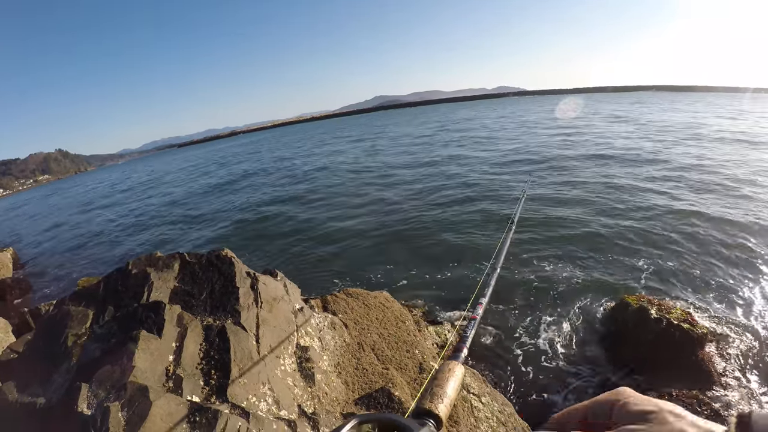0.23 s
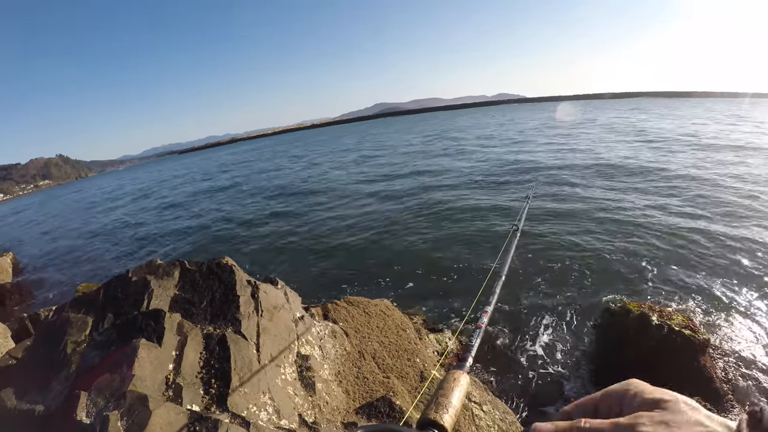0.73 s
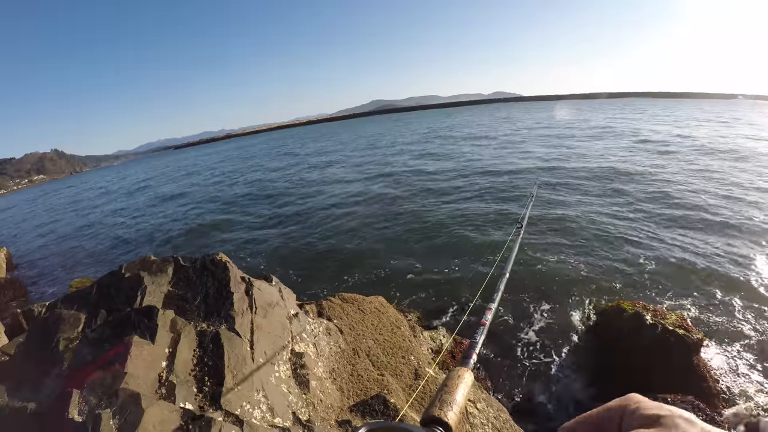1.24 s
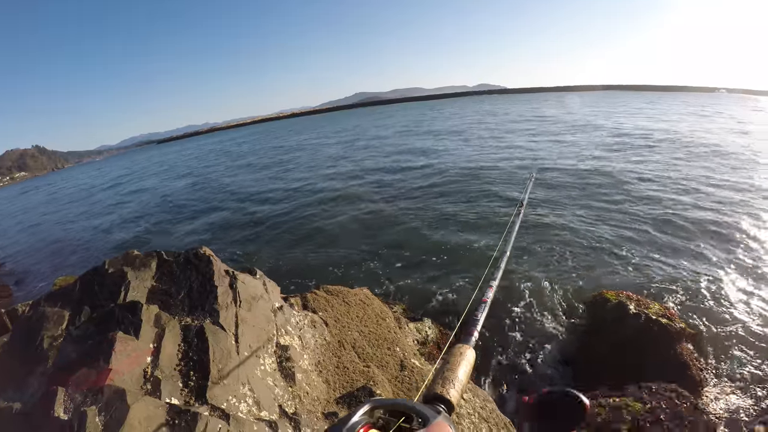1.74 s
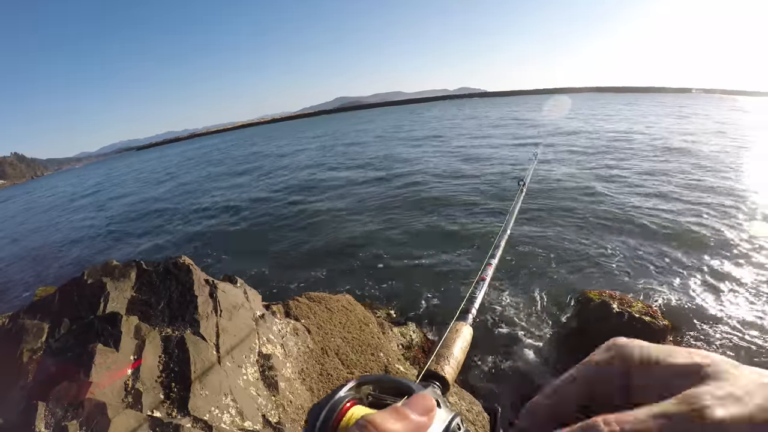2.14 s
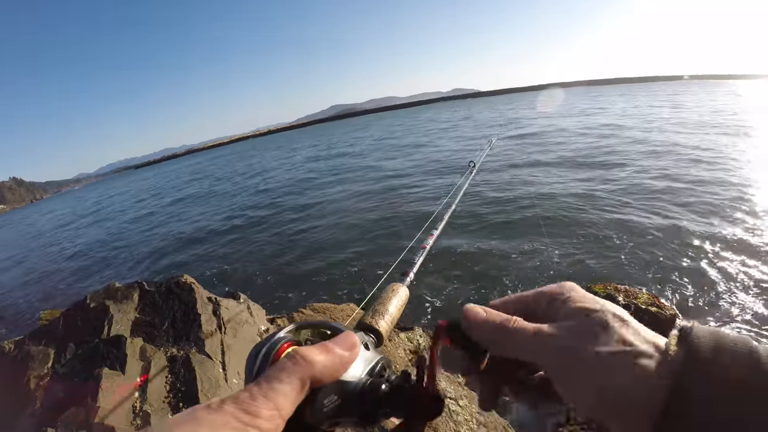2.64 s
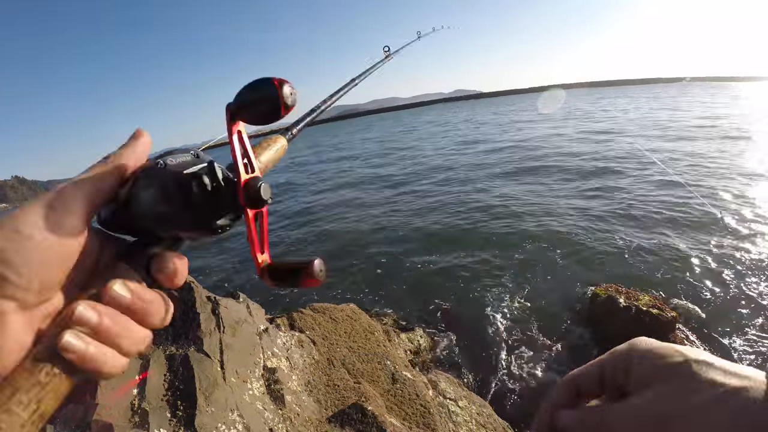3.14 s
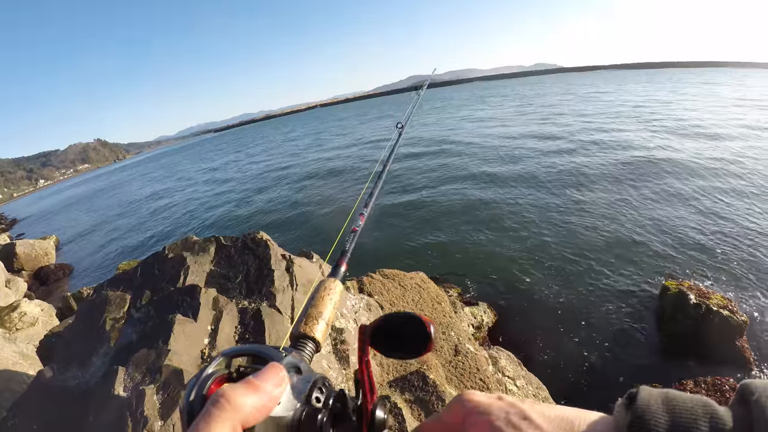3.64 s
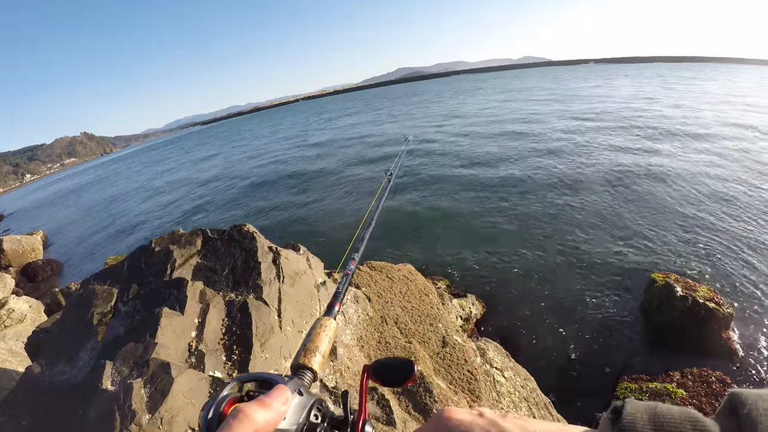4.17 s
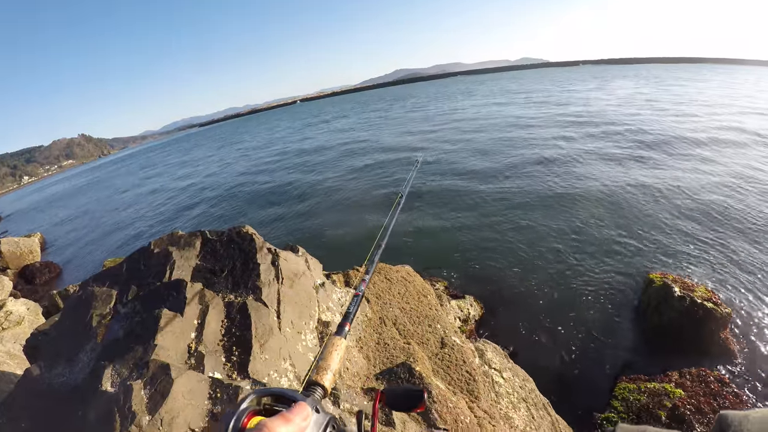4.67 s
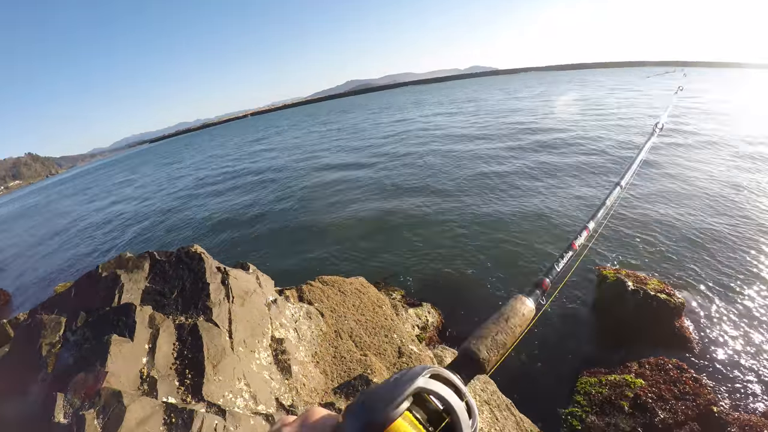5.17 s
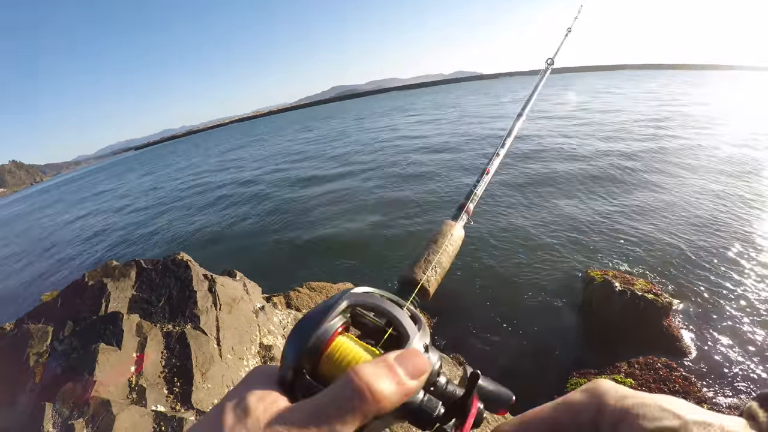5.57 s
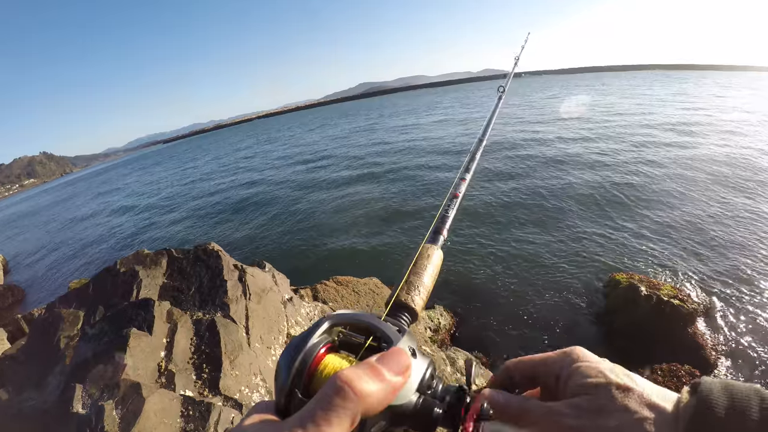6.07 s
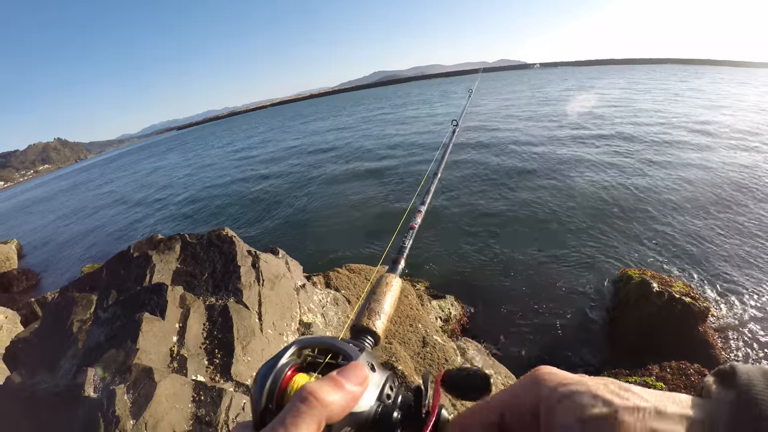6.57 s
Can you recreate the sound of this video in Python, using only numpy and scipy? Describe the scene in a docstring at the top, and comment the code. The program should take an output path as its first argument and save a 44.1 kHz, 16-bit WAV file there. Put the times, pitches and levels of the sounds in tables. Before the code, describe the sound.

Small ocean waves slosh, gulp and fizz against rocks, then drop to calmer lapping with light wind and faint fishing reel clicks.

```python
"""Small waves wash over jetty rocks in the wind, close to a microphone worn by an angler.
First a wave runs in: crests slap, trapped air gulps, and the fishing reel clicks once. Near 3 s the
wave surges against the rocks in a peak of rumble, slosh and fizzing foam. At 3.26 s a hard cut drops to
a calmer sea in mono, lapping and gulping under gusts. Around 5 s the reel clicks and rasps in the hand;
from 5.5 s the stereo image opens again, and at the end the next wave starts to build."""
import sys
import numpy as np
from scipy import signal
from scipy.fft import rfft, irfft
from scipy.io import wavfile
from scipy.ndimage import uniform_filter1d

SR = 44100
rng = np.random.default_rng(int(sys.argv[2]) if len(sys.argv) > 2 else 0)


def wav_out(sig):
    """Save sig, one row per channel (or a flat mono array), as 16-bit PCM at SR to the path in sys.argv[1]."""
    wavfile.write(sys.argv[1], SR, np.round(np.clip(np.atleast_2d(sig).T, -1, 1) * 32767).astype(np.int16))


N = 300321
TIME, HZ = np.arange(N) / SR, np.fft.rfftfreq(N, 1 / SR)


# slow fader moves of the wave: (time [s], rumble [dB], slosh [dB], foam [dB])
WAVE_FADERS = [(0, -29, -33.5, -44.5), (.65, -29.5, -35.5, -46), (1.15, -28, -37, -45.5),
               (1.6, -28.5, -35.5, -41), (1.88, -28.5, -36, -41.5), (2.08, -27.5, -33.5, -37),
               (2.6, -27.5, -31.5, -37), (2.9, -24, -28.5, -37.5), (3.25, -24.5, -30.5, -40)]
# tone of the wave: (frequency [Hz], relative level [dB])
WAVE_EQ = [(60, -47), (104, -32.5), (124, -25.5), (148, -1), (340, -2.5), (620, -7.5), (850, -7.5),
           (1150, -14), (1700, -14), (2900, -24.5), (4100, -26.5), (4800, -30), (6400, -25.5), (8200, -39),
           (9900, -44), (11200, -54.5), (12400, -50.5), (14500, -61)]
# water surging against the rocks: (start [s], hold [s], lift before each layer's share [dB])
SURGES = [(-0.02, 0.11, 4.5), (0.225, 0.14, 4.5), (0.421, 0.054, 4.5), (0.496, 0.076, 5), (0.748, 0.13, 2),
          (0.88, 0.059, 3), (1.48, 0.03, -1), (2.18, 0.03, 3), (2.65, 0.081, 2), (2.794, 0.065, 1.5),
          (2.933, 0.028, 1.5), (3.212, 0.03, 3.5)]
# sheets of spray falling back on the water: (start [s], hold [s], foam lift [dB])
SPRAYS = [(.44, 0.045, 1.5), (.7, .05, 2.5), (1.37, 0.026, 1.5), (2.635, 0.028, 1.5), (2.955, .03, 3.5),
          (3.04, 0.059, 3.5)]

def breaking_wave(low, mid, high):
    """The wave surges against the rocks, lifting the rumble most; falling spray flares the foam."""
    levels_db = ride_faders(WAVE_FADERS, SURGES, shares=(0.95, 0.27, 0.46))
    return sea([low, mid, high * gain_of(lift(SPRAYS))], WAVE_EQ, levels_db, deepening=1.0)


# slow fader moves of the calm: (time [s], rumble [dB], slosh [dB], foam [dB])
CALM_FADERS = [(3.28, -40, -49, -58.5), (3.9, -37.5, -50, -60), (4.9, -39, -51, -60),
               (5.25, -35.5, -49, -57.5), (5.9, -38.5, -46, -57), (6.5, -35, -47.5, -57.5),
               (6.8, -34.5, -38.5, -53.5)]
# tone of the calm: (frequency [Hz], relative level [dB])
CALM_EQ = [(60, -35), (104, -34), (124, -15), (148, -0.5), (320, -3.5), (520, -10.5), (800, -14.5),
           (1150, -21.5), (2000, -22), (3100, -32.5), (4200, -30.5), (7200, -39), (10000, -40),
           (11800, -47), (14500, -54)]
# wavelets lapping: (start [s], hold [s], lift before each layer's share [dB])
LAPS = [(3.405, 0.12, 9), (3.588, 0.051, 7), (4.05, 0.09, -0.5), (4.78, 0.037, 2), (5.075, 0.059, 5),
        (5.335, 0.04, 1.5), (5.584, 0.1, 2.5)]

def calm_sea(low, mid, high):
    """Wavelets lap: single bubbles stand out in calmer water, and the treble is a distant hiss."""
    single_bubbles = bubbles(486.0, 1376, per_s=260, cycles=4.3, spread_db=2.0, glide=0.018)
    lapping = mid + gain_of(-15.0) * ports(single_bubbles)
    hiss = high + ports(patchy_noise(patch_db=2.0, size=(8, 9)))
    levels_db = ride_faders(CALM_FADERS, LAPS, shares=(0.43, 0.19, 0.23))
    return sea([low, lapping, hiss], CALM_EQ, levels_db, deepening=0.13)


def sea(textures, eq, levels_db, deepening):
    """Rumble, slosh and foam share one EQ; each has its own band and rides its own fader."""
    bands = below(479), above(362) * below(1750), above(2360)
    cores_hz = (110, 450), (550, 2000), (2800, 9000)  # each layer's level is set in this range
    out = np.zeros((2, N))
    for texture, band, (lo, hi), level_db in zip(textures, bands, cores_hz, levels_db):
        layer = filtered(texture, band * gain_of(curve(eq)))
        core = filtered(layer.mean(0), (HZ > lo) & (HZ < hi))
        out += layer / core.std() * gain_of(level_db)
    # when the rumble swells, its lowest part swells further, so the sound deepens
    surge_db = levels_db[0] - levels_db[0].mean()
    return out + filtered(out, below(250) ** 2) * (gain_of(deepening * surge_db) - 1)


def rumble(lump_db=1.1):
    """Wind eddies and surging water: lumpy noise that feeds the sea's low band."""
    return rng.standard_normal((2, N)) * gain_of(lump_db * wander(17.0))


def slosh(bubbles_db=-12, flicker_db=-0.26):
    """Water folds over the rocks and traps a dense crowd of small bubbles."""
    air = bubbles(449.7, 2890, per_s=1300, cycles=4.1, spread_db=1.0, glide=0.012)
    water = patchy_noise(patch_db=1.0, size=(9, 4))
    return (water + gain_of(bubbles_db) * air) * gain_of(flicker_db * wander(37))


def foam(spray_db=-8.0, flicker_db=0.67):
    """Bursting foam hisses; droplets of spray tick on the water."""
    spray = bubbles(1980, 13000, per_s=2800, cycles=3.8, spread_db=3.5, glide=0.015)
    hiss = patchy_noise(patch_db=1.5, size=(8, 9))
    return (hiss + gain_of(spray_db) * spray) * gain_of(flicker_db * wander(22))


def bubbles(lo_hz, hi_hz, per_s, cycles, spread_db, glide, pitches=36):
    """Two swarms of bubbles, each a damped ring rising in pitch; most are soft, a few loud."""
    out = np.zeros((2, N))
    for hz in np.geomspace(lo_hz, hi_hz, pitches):
        age = np.arange(int(5 * cycles * SR / hz) + 8) * hz / SR / cycles  # in decay times
        ring = np.sin(2 * np.pi * cycles * age * (1 + glide * age))
        ring = ring * np.exp(-age) * (1 - np.exp(-8 * age))
        onset, swarm, luck, chance = rng.random((4, 1200))
        born = chance < per_s * N / SR / pitches / len(chance)
        strength = gain_of(spread_db * np.minimum(-np.log(1 - luck), 4))
        births = np.zeros((2, N))
        births[(2 * swarm[born]).astype(int), (onset[born] * N).astype(int)] = strength[born]
        out += hz * signal.oaconvolve(births, ring[None], axes=1)[:, :N]
    return unit_rms(out)


# crests hitting the rock: (time [s], relative level [dB], top of the body [Hz], decay [s])
SLAPS = [(0.262, -15, 1200, 0.028), (0.328, -19, 1170, 0.03), (0.435, -15, 750, 0.024),
         (0.456, -19, 1000, 0.018), (0.535, -14.5, 700, 0.022), (0.576, -19, 1300, 0.0042),
         (2.305, -13.5, 895, .012), (2.408, -12.5, 690, 0.02), (2.472, -18, 890, 0.024),
         (2.794, -11, 1310, 0.013), (2.856, -26, 1200, 0.018), (2.978, -13, 1000, 0.013),
         (3.124, -12, 1000, 0.019), (3.449, -32, 900, 0.028), (4.8, -33.5, 1100, 0.013),
         (4.829, -30, 700, .008), (5.69, -29, 1100, 0.014), (6.394, -33, 800, 0.0046),
         (6.442, -36, 900, .018), (6.52, -31, 900, 0.0089), (6.625, -34, 800, 0.01),
         (6.723, -22.5, 750, 0.011)]

def slaps(trim_db=-3, attack_s=0.00201):
    """A crest folds against the rock: a quick burst of splash, duller or brighter with its body."""
    out, t = np.zeros((2, N)), np.arange(SR // 8) / SR
    for s, db, body_hz, decay_s in SLAPS:
        band = signal.butter(1, [body_hz / 3, body_hz], "bandpass", fs=SR, output="sos")
        envelope = (1 - np.exp(-t / attack_s)) * np.exp(-t / decay_s)
        for side in out:
            burst = signal.sosfilt(band, rng.standard_normal(len(t))) * envelope
            add(side, s - attack_s, gain_of(db + trim_db) * burst / abs(burst).max())
    return ports(filtered(out, above(190, order=14) * below(2100, order=4)))


# air pockets between the rocks: (time [s], relative level [dB], pitch [Hz], decay [s])
GULPS = [(0.203, -8.5, 333, 0.014), (0.532, -9, 305, 0.008), (0.808, -11.5, 287, 0.023),
         (1.488, -11, 300, 0.01), (2.04, -13.5, 1580, 0.0041), (2.826, -7, 250, 0.0059),
         (2.902, -3, 210, 0.0039), (2.946, -6.5, 332, 0.0093), (2.96, -11, 208, 0.0096),
         (3.035, -6, 212, 0.0045), (3.082, -13, 203, 0.0061), (3.18, -12, 192, .006),
         (3.229, -11, 251, 0.0064), (3.431, -29, 730, 0.011), (3.461, -30, 850, 0.0054),
         (3.506, -37, 1360, .005), (3.596, -37, 1050, .005), (3.636, -34, 1140, .006),
         (3.819, -42, 1400, .007), (4.79, -33, 649, .006), (4.829, -24, 567, .006),
         (5.092, -28, 845, 0.0077), (5.647, -24, 720, 0.0059), (5.705, -32, 1110, 0.006),
         (5.788, -21, 230, .004), (5.925, -23, 330, .005), (5.972, -30, 700, .006),
         (6.144, -22, 594, 0.004), (6.647, -24, 694, 0.0054), (6.707, -33, 2150, .004),
         (6.767, -16.5, 920, 0.0053)]

def gulps(trim_db=-3, detune=0.12, stagger_s=0.018, rise_per_s=1.4, count=7):
    """Each pocket of air breaks into a few bubbles that chirp upward, the first the loudest."""
    out, t = np.zeros(N), np.arange(SR // 10) / SR
    for s, db, hz, decay_s in GULPS:
        envelope = np.exp(-t / decay_s) * (1 - np.exp(-t / 0.002))
        for k in range(count):
            trailing = k > 0
            pitch = hz * np.exp(detune * rng.standard_normal() * trailing)
            delay = stagger_s * rng.random() * trailing
            ring = np.sin(2 * np.pi * pitch * t * (1 + rise_per_s * t)) * envelope
            add(out, s + delay, gain_of(db + trim_db) * ring / (1 + k) ** 2)
    return filtered(out, above(140, order=18))


# clicks and scrapes of the reel and its handle:
# (time [s], relative level [dB], centre [Hz], half-width [octaves], rasp decay [s], metal ring [0-1])
REEL_CLICKS = [(1.1822, -26.5, 6940, 0.16, .002, 0.1), (4.09, -45, 4400, .3, .008, 0),
               (4.33, -44, 4400, .3, 0.0046, 0), (5.054, -43, 4200, .2, 0.036, 0),
               (5.0747, -34, 3200, .9, .0015, .25), (5.08, -40, 4400, 0.36, .006, 0),
               (5.0844, -28, 4800, .9, 0.0012, .42), (5.097, -40, 2000, 0.54, .012, 0),
               (5.1035, -41, 4300, 0.27, 0.0063, .4), (5.1225, -35, 4860, 0.26, 0.0012, 0.2),
               (5.139, -41, 4000, 0.23, .006, .45), (5.185, -41.5, 3900, .2, .008, 0),
               (5.1899, -24.5, 3370, 0.75, 0.00079, .08), (5.19, -27.5, 550, 0.67, .001, 0.04),
               (5.8343, -38, 4000, 0.8, 0.0018, 0), (6.1074, -40, 6150, .6, 0.0054, 0),
               (6.2373, -33, 7000, 0.64, 0.0014, 0.1), (6.5949, -42, 6170, 0.11, .003, 0)]
# resonances of the reel's body: (frequency [Hz], width [Hz], relative level [dB])
REEL_BODY = [(850, 660, 17), (3200, 1700, 11), (4200, 380, -7), (5200, 290, -1), (7500, 510, -5),
             (9500, 550, 10)]
# modes of its metal parts: (frequency [Hz], relative level [dB], decay [s])
REEL_METAL = [(4070, 1, .004), (4530, -4, .0025), (7750, -7, .002), (9340, -10, .003)]

def reel(rasp=0.52, grit_db=3.0, contact_s=.0003):
    """A snap and a gritty rasp pass through the reel's body; some contacts also ring the metal."""
    out, t, f = np.zeros(N), np.arange(4096) / SR, np.fft.rfftfreq(4096, 1 / SR)
    body = sum(gain_of(db) * 1j * f * width / (hz ** 2 - f ** 2 + 1j * f * width)
               for hz, width, db in REEL_BODY)
    body = body / np.sqrt(1 + (f / 10500) ** 12)
    metal = sum(gain_of(db) * np.sin(2 * np.pi * hz * t) * np.exp(-t / decay_s)
                for hz, db, decay_s in REEL_METAL)
    metal = metal * (1 - np.exp(-t / contact_s))
    snap = t == 0
    for s, db, centre_hz, octaves, rasp_s, ring in REEL_CLICKS:
        roughness = unit_rms(uniform_filter1d(rng.standard_normal(len(t)), size=40))
        grit = unit_rms(gain_of(grit_db * roughness))
        contact = rasp * grit * rng.standard_normal(len(t)) * np.exp(-t / rasp_s) - snap
        bell_eq = 1 / (1 + (np.log2((f + 1) / centre_hz) / octaves) ** 2)
        click = irfft(rfft(contact) * body * bell_eq)
        click = click / abs(click).max() + ring * metal
        add(out, s, gain_of(db) * np.roll(click, SR // 1000))  # 1 ms of room for the attack
    return out


# gusts pressing on the microphone: (peak time [s], half-length [s], level [dB])
GUSTS = [(3.45, 0.3, -59), (4.3, 0.41, -67), (5.55, .15, -69), (6.3, .12, -62), (6.74, 0.13, -50)]

def wind_buffet(breeze_db=-77.5, shared=0.44, lump_db=2):
    """Deep pressure swings, partly different at each microphone port: a lumpy breeze with gusts."""
    push = filtered(rng.standard_normal((3, N)), above(27) * below(52, order=3) * below(110))
    gusts = sum(gain_of(db) * np.exp(-((TIME - s) / half_s) ** 2) for s, half_s, db in GUSTS)
    force = gain_of(breeze_db) + gusts
    return unit_rms(shared * push[0] + push[1:]) * force * gain_of(lump_db * wander(9.6))


# phase between the microphone's two ports: (frequency [Hz], left lead [rad])
PORT_PHASE = [(100, 0.5), (400, -0.12), (600, -1), (690, -3), (760, -4), (1300, -3.5), (2500, -5.5),
              (3200, -5), (5000, -7.5), (9000, -10), (14000, -13)]
# how alike they sound: (frequency [Hz], coherence [0-1])
PORT_COHERENCE = [(50, .6), (130, 0.97), (300, 0.93), (500, 0.84), (690, 0.12), (850, 0.32), (1400, 0.56),
                  (2100, 0.59), (2500, 0.37), (4000, 0.67), (6500, 0.45), (9000, 0.29)]
# their balance: (frequency [Hz], left minus right [dB])
PORT_BALANCE = [(60, -1), (200, -3), (420, -5), (690, -13.5), (1000, -8), (1600, -4.5), (2300, -3),
                (2900, -6), (5300, -5), (7000, -2), (14000, -0.5)]

def ports(pair):
    """Two unrelated sounds become the partly alike left and right ports, with a flat mono sum."""
    a, b = rfft(pair)
    alike = np.clip(curve(PORT_COHERENCE), 0, 1)
    apart = np.sqrt(1 - alike ** 2)
    left = gain_of(curve(PORT_BALANCE)) * np.exp(1j * curve(PORT_PHASE))
    mono_gain = np.hypot(abs(1 + alike * left), abs(apart * left)) / 2
    return irfft(np.array([left * (alike * a + apart * b), a]) / mono_gain, N)


def ride_faders(faders, swells, shares):
    """Levels in dB of rumble, slosh and foam: a slow fader move plus each one's share of the swells."""
    s, *slow_db = np.transpose(faders)
    return [np.interp(TIME, s, db) + share * lift(swells) for db, share in zip(slow_db, shares)]


def lift(swells, attack_s=0.018, release_s=0.025):
    """Gain in dB of swells that rise, hold and drain."""
    total_db = 0
    for start, hold, db in swells:
        rise, drain = (TIME - start) / attack_s, 1 - (TIME - start - hold) / release_s
        total_db += db * np.clip(np.minimum(rise, drain), 0, 1)
    return total_db


def patchy_noise(patch_db, size):
    """Two unrelated noises whose level drifts in patches of size (frames, bins)."""
    spectra = signal.stft(rng.standard_normal((2, N)), nperseg=512, noverlap=384)[2]
    patches = rng.standard_normal(spectra.shape[1:])
    patches = unit_rms(uniform_filter1d(uniform_filter1d(patches, size[0], 1), size[1], 0))
    noise = signal.istft(spectra * gain_of(patch_db * patches), nperseg=512, noverlap=384)[1]
    return unit_rms(noise[:, :N])


def wander(rate_hz):
    """Slow random modulation with an rms of 1."""
    return unit_rms(filtered(rng.standard_normal(N), below(rate_hz) * above(rate_hz / 10)))


def gain_of(db):
    """Decibels to gain."""
    return 10 ** (np.asarray(db) / 20)


def unit_rms(x):
    """Scales to an rms of 1."""
    return x / np.sqrt(np.mean(x ** 2) + 1e-20)


def curve(points):
    """Joins breakpoints along log frequency."""
    f, value = np.transpose(points)
    return np.interp(np.log(HZ + 1), np.log(f + 1), value)


def filtered(x, gain):
    """Filters by a gain on the frequency axis."""
    return irfft(rfft(x) * gain, N)


def above(hz, order=6):
    """Gain of a smooth high-pass."""
    return np.sqrt(1 - 1 / (1 + (HZ / hz) ** order))


def below(hz, order=6):
    """Gain of a smooth low-pass."""
    return np.sqrt(1 / (1 + (HZ / hz) ** order))


def add(mix, s, sound):
    """Mixes a sound in at s seconds."""
    part = mix[max(round(s * SR), 0):][:len(sound)]
    part += sound[:len(part)]


def scene(cut_s=3.262, opens_s=5.524, opening_s=0.99, open_width=0.91):
    """The breaking wave, then a hard cut to the calm sea; the close sounds run through both."""
    low, mid, high = (ports(source) for source in (rumble(), slosh(), foam()))
    close = wind_buffet() + gulps() + slaps() + reel()
    wave = breaking_wave(low, mid, high) + close
    calm = calm_sea(low, mid, high) + close
    # the calm starts in mono, then widens
    mono = calm.mean(0)
    width = open_width * np.clip((TIME - opens_s) / opening_s, 0, 1)
    calm = mono + width * (calm - mono)
    # the top end fades back in after the cut
    dullness = np.clip((3.58 - TIME) / 0.28, 0, .8)
    calm = calm - dullness * filtered(calm, above(5600, order=12) ** 2)
    crossfade = np.clip((TIME - cut_s) / 0.011 + .5, 0, 1)
    return (1 - crossfade) * wave + crossfade * calm


def record(dry):
    """A steep high cut at 14.9 kHz."""
    high_cut = signal.firwin(511, 14900, window=("kaiser", 9), fs=SR)
    return signal.oaconvolve(dry, high_cut[None], "same")


dry = scene()
out = record(dry)
wav_out(out)
```